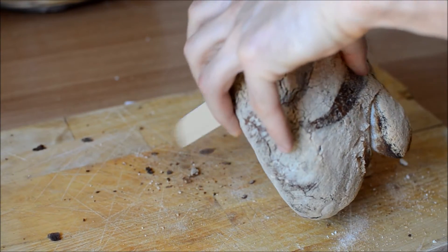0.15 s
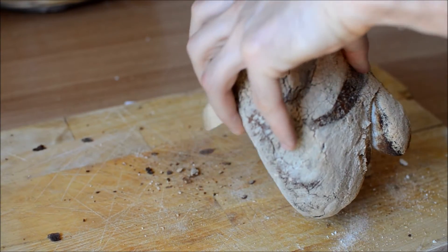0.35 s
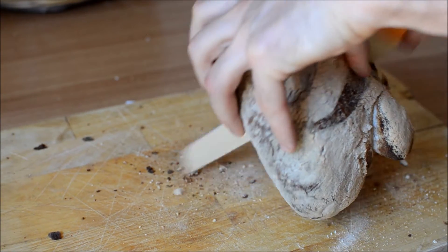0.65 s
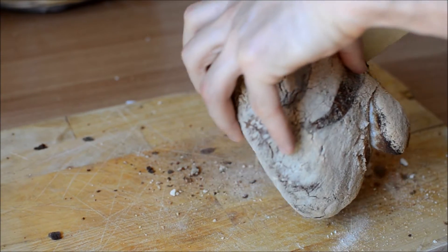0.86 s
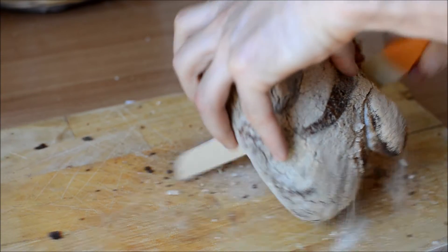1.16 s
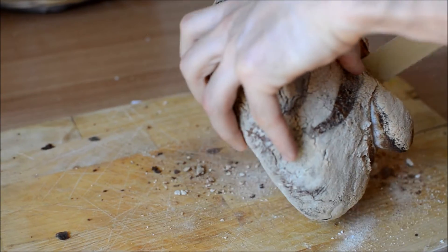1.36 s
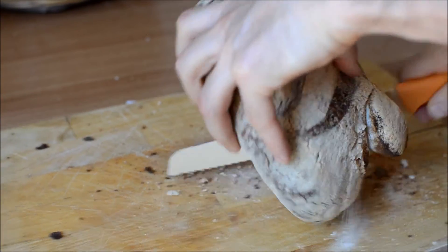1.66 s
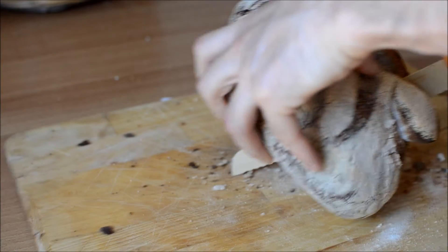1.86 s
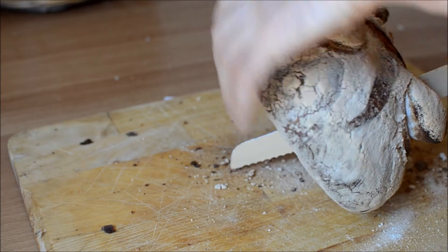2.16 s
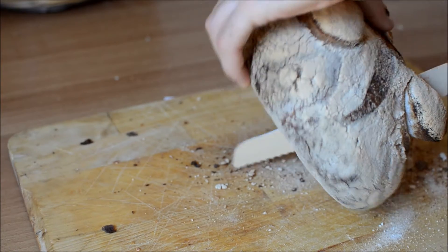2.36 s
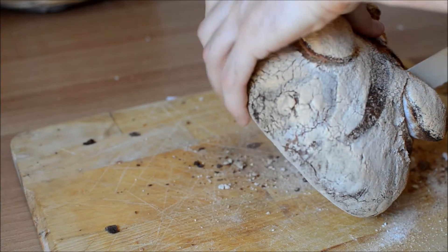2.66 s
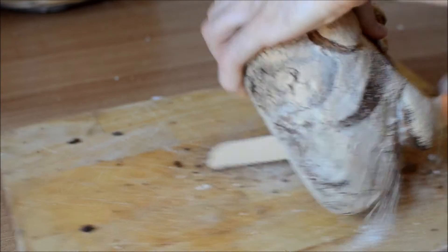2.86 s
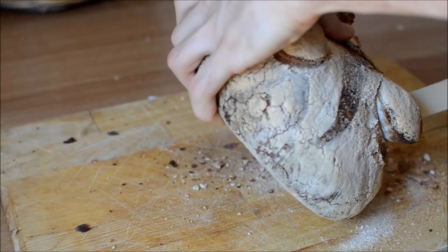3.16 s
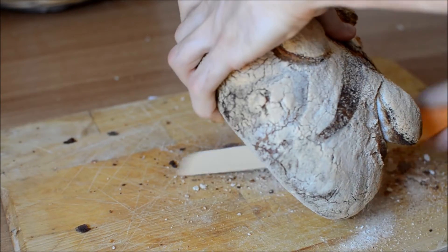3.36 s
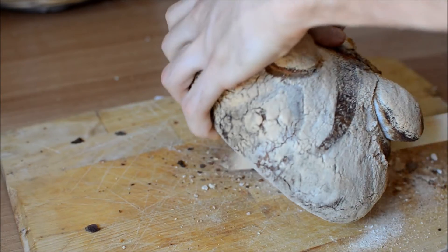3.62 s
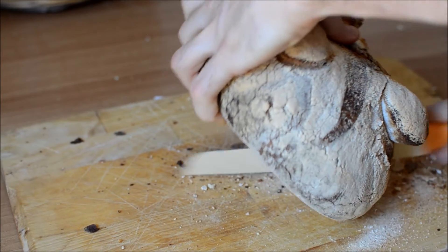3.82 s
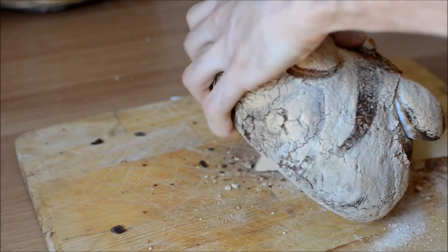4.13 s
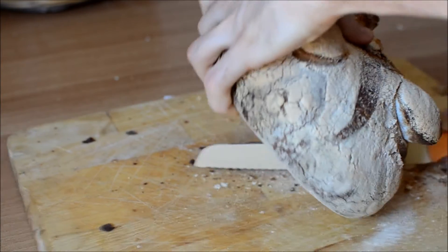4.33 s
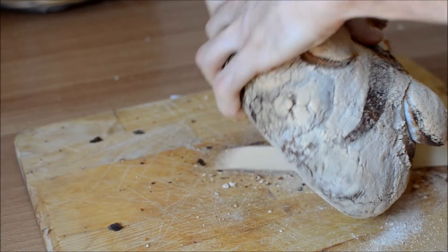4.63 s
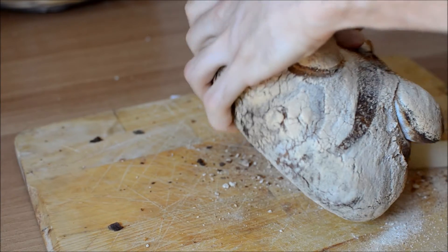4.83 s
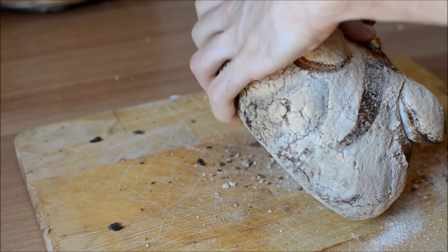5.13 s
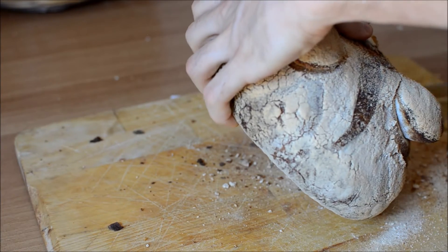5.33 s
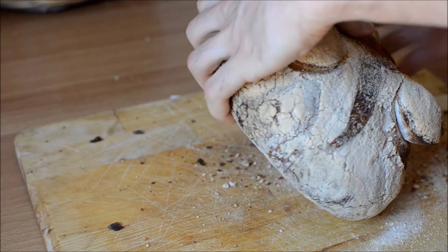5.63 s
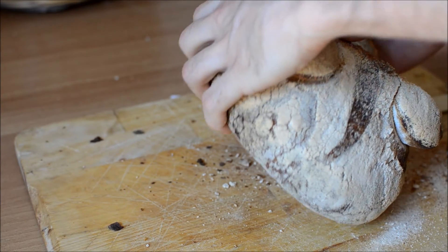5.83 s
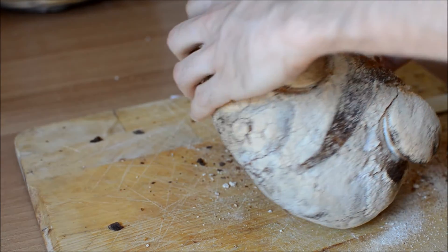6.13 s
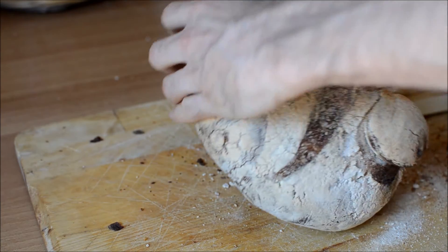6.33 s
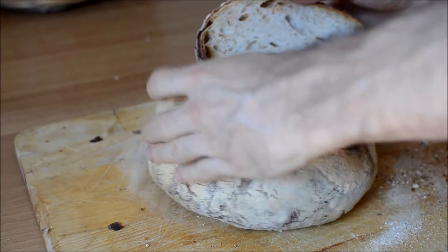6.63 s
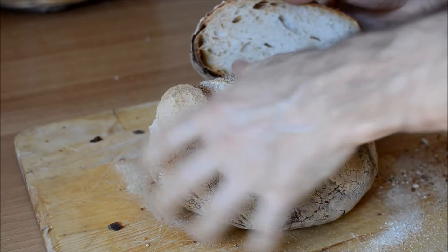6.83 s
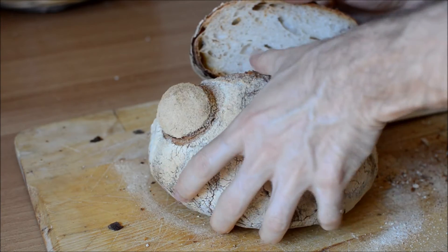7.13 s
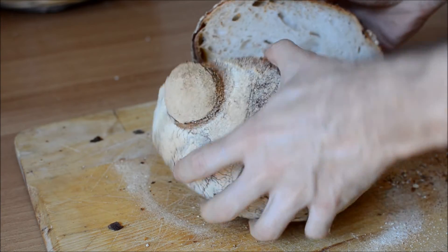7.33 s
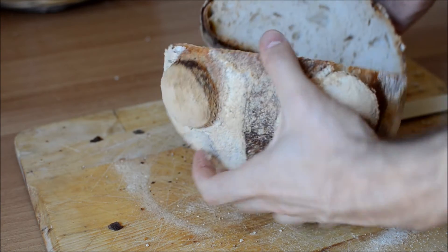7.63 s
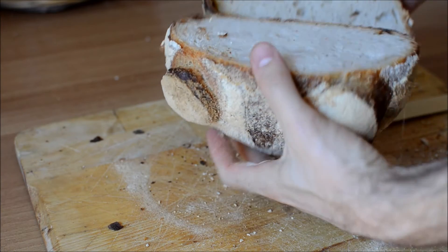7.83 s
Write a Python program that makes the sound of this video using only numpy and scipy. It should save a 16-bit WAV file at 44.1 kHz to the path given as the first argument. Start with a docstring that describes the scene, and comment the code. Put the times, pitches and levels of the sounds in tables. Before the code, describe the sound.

A serrated knife saws in uneven strokes through a hard bread crust with dry crackles and snaps, then clatters down; the loaf thumps over and slides.

```python
"""A serrated knife saws through a crusty loaf on a wooden board in a bare, ringing kitchen with a quiet room tone.
Hard pushes come among light strokes: impulse noise gated by the teeth rasps, crackles and drums,
pitched breaks snap, and in light strokes the blade rubs with a hollow tone.
The knife then clatters down as a run of resonant impacts. The loaf is slid over the floury board with soft
friction noise, tips onto its base with dull thumps and crunching crumbs, and is slid again."""
import sys
import numpy as np
from scipy import signal
from scipy.io import wavfile

SR = 44100
rng = np.random.default_rng(int(sys.argv[2]) if len(sys.argv) > 2 else 0)


def output_pcm(signal):
    """Save a mono or channel-first signal as 16-bit PCM at the path in sys.argv[1].

    Samples are clipped to [-1, 1] before scaling.
    """
    pcm = np.clip(np.atleast_2d(signal).T, -1, 1) * 32767
    wavfile.write(sys.argv[1], SR, np.round(pcm).astype(np.int16))


N = 351910
TIME = np.arange(N) / SR

# spectrum of breaking crust, for large pieces and small chips: frequency_hz, level_db
SNAP_COLOUR = [(300, -24.5), (1200, -5.5), (3000, -1.5), (4500, -2), (8000, -2.5), (11000, -14),
               (16000, -30.5)]
# light strokes, drawing back or easing through, levels before the layer trims:
# start_s, hold_s, rasp_db, drumming_db, crackle_db, rub_pitch_hz
PULLS = [(0.01, 0.13, -56, -56.5, -58.5, 1120), (0.58, 0.088, -58.5, -61, -63, 700),
         (0.876, 0.037, -50.5, -56, -51, 1040), (1.13, 0.1, -59, -65, -66, 620),
         (1.715, 0.033, -66.5, -74, -61, 1400), (1.99, .07, -81, -97, -76.5, 1390),
         (2.345, 0.061, -66, -68, -65, 518), (2.45, 0.086, -70.5, -72, -73.5, 860),
         (2.84, 0.094, -62, -83, -60.5, 1120), (3.04, .05, -65, -68, -79, 1070),
         (3.505, 0.05, -58, -59, -59, 690), (3.865, .04, -59, -71, -55, 2060),
         (3.96, 0.041, -60, -59.5, -60.5, 1280), (4.17, 0.062, -57.5, -59.5, -57.5, 604),
         (4.365, 0.039, -54, -58, -57, 854), (4.79, 0.046, -57, -60, -72, 520),
         (5.065, .02, -66, -71, -61.5, 1390), (5.105, .035, -58, -62.5, -59.5, 1460),
         (5.167, .03, -60, -56, -73, 1440)]


def amp(db):
    """Level to amplitude: 20 dB is a factor of ten."""
    return 10 ** (np.asarray(db) / 20)


def unit(x):
    """Normalisation to a root-mean-square value of one."""
    return x / np.sqrt(np.mean(x ** 2) + 1e-20)


def read(points, hz):
    """Interpolation of a frequency-dependent quantity on a logarithmic frequency axis."""
    f, value = np.transpose(points)
    return np.interp(np.log(hz + 1), np.log(f + 1), value)


def add(mix, s, sound):
    """Superposition: a sound is summed into the mix from time s."""
    part = mix[max(round(s * SR), 0):][:len(sound)]
    part += sound[:len(part)]


def response(db_at, size=4096):
    """Minimum-phase impulse response: the Hilbert transform of the log gain yields a causal phase."""
    hz = abs(np.fft.fftfreq(size, 1 / SR))
    log_gain = np.log(amp(np.maximum(db_at(hz), -100)))
    spectrum = np.exp(np.conj(signal.hilbert(log_gain)))
    return np.fft.ifft(spectrum).real[:size // 2]


def colour(x, points):
    """Minimum-phase filtering: shapes the spectrum without smearing attacks backwards."""
    return signal.oaconvolve(x, response(lambda hz: read(points, hz)))[:len(x)]


def resonate(x, hz, width):
    """Second-order resonance: gain one at its peak, set by centre frequency and bandwidth."""
    return signal.lfilter(*signal.iirpeak(hz, max(hz / width, 1), SR), x)


def wander(per_s):
    """Band-limited chance: random knots joined by straight lines, rms one."""
    knots = rng.standard_normal(8192)
    return unit(np.interp(TIME * per_s, np.arange(len(knots)), knots))


def clicks(per_s, spread_db, size=65536):
    """Impulse noise: random times and signs, levels spread exponentially in dB up or down from 0 dB."""
    count = int(per_s * N / SR)
    at, height, sign = rng.random((size, 3))[:count].T
    strength = amp(spread_db * np.minimum(-np.log1p(-height), 4))
    return np.bincount((at * N).astype(int), strength * np.sign(sign - .5), N)


def burst(points, crumble_s, crumble, size=2048):
    """Fracture impulse: one sharp break, then exponentially decaying noise; spectrum shaped, peak one."""
    decay = np.exp(-np.arange(size) / SR / crumble_s)
    drive = crumble * rng.standard_normal(size) * decay
    drive[0] = 1
    sound = colour(drive, points) * np.linspace(1, 0, size)
    return sound / abs(sound).max()


def swell(s, hold_s, rise_db_per_s, fall_db_per_s):
    """Exponential envelope: a gentle movement rises, holds and dies away at constant dB per second."""
    before_s = np.maximum(s - TIME, 0)
    after_s = np.maximum(TIME - s - hold_s, 0)
    return amp(-rise_db_per_s * before_s - fall_db_per_s * after_s)


def room_tone(level_db=-68):
    """Stationary background noise: white noise through a fixed spectrum."""
    # spectrum of the quiet room: frequency_hz, level_db
    tone_colour = [(15, -41), (25, -7), (137, -4.5), (222, -0.5), (283, -6), (342, 0.5), (729, -5),
                   (1320, -7), (1550, -5), (4100, -18), (5660, -20.5), (6310, -20), (8720, -27.5),
                   (15800, -45.5)]
    return amp(level_db) * unit(colour(rng.standard_normal(N), tone_colour))


def room(x, wet_db, gap_s=.002, build_s=0.0007):
    """Reverberation: direct sound, then dense reflections decaying at a frequency-dependent rate."""
    # time for a 60 dB decay, shortest in the treble: frequency_hz, decay_s
    decay_time = [(120, .68), (400, 0.55), (1000, 0.51), (2100, 0.52), (3000, .47), (7000, .4),
                  (14000, 0.38)]
    # initial spectrum of the reflections: frequency_hz, level_db
    wall_colour = [(60, 4), (300, -2), (1000, 1.5), (2500, 0), (5000, -0.5), (12000, -1)]
    t = np.arange(SR) / SR
    taps = rng.choice([-1., 1.], SR) * (rng.random(SR) < .15)  # random reflections over one second
    hz, age, bands = signal.stft(taps, SR, nperseg=256)
    fall_db = read(wall_colour, hz)[:, None] - 60 * age / read(decay_time, hz)[:, None]
    tail = signal.istft(bands * amp(fall_db), SR, nperseg=256)[1][:SR]
    tail = tail * np.clip((t - gap_s) / build_s, 0, 1)
    paths = amp(wet_db) * tail / np.linalg.norm(tail)  # reflected energy relative to direct
    paths[0] += 1
    return signal.oaconvolve(x, paths)


def flakes(per_s, spread_db, sharpness=1.6, count=6):
    """Brittle fracture: flakes of several sizes break, each size ringing at its own broad resonance."""
    # spectrum of the crackling crust: frequency_hz, level_db
    crackle_colour = [(500, -32.5), (1500, -3.5), (2700, 0.5), (3700, 0.5), (5200, -1.5), (6400, -2.5),
                      (8000, -8), (10000, -13.5), (12500, -22.5), (16000, -38)]
    out = np.zeros(N)
    for hz in np.geomspace(2000, 12000, count):
        breaks = clicks(per_s / count, spread_db, size=16384)
        out += unit(resonate(breaks, hz, hz / sharpness)) * np.sqrt(hz)
    return unit(colour(out, crackle_colour))


def handling(brush_db=-1):
    """Sliding friction: the loaf rubs over the floury board while fingers brush its crust."""
    # the hand moves the loaf, brushing before its trim: start_s, hold_s, slide_db, brush_db
    rubs = [(5.84, 0.058, -67, -62), (6.173, 0.074, -68.5, -81), (6.399, 0.12, -67, -68.5),
            (6.818, .14, -66, -93.5), (7.004, 0.53, -67, -77), (7.536, 0.12, -61.5, -78),
            (7.72, 0.29, -65, -88)]
    # spectrum of loaf sliding on board: frequency_hz, level_db
    slide_colour = [(35, -36), (60, -32), (90, -2), (140, 4), (180, -12), (400, 0.5), (720, -10),
                    (1470, -2), (3200, -11.5), (5100, -24), (8000, -38), (14000, -76)]
    gains = [amp(levels_db)[:, None] * swell(s, hold_s, rise_db_per_s=130, fall_db_per_s=80)
             for s, hold_s, *levels_db in rubs]
    slide, brush = np.max(gains, axis=0)
    rub = unit(colour(clicks(per_s=4300, spread_db=4.5), slide_colour))
    return slide * rub + amp(brush_db) * brush * flakes(per_s=5000, spread_db=4.5)


def loaf_down():
    """Soft-body impact: the loaf rocks onto its base with dull thumps and crunches crumbs under it."""
    # contacts of the tipping loaf: start_s, thump_db, crunch_db
    drops = [(6.5113, -36, -39.5), (6.525, -41, -37.5), (6.543, -46, -33.5), (6.557, -42.5, -38)]
    # spectrum of the whole loaf on the board: frequency_hz, level_db
    loaf_colour = [(25, -44), (50, -28), (100, 1), (180, -0.5), (330, 7), (600, -9), (1300, -16),
                   (2400, -27), (6000, -70)]
    # spectrum of crumbs under the loaf: frequency_hz, level_db
    crunch_colour = [(100, -26.5), (700, 1.5), (1900, 2), (2500, -3.5), (3200, -5.5), (4500, -9.5),
                     (6000, -14.5), (8300, -23.5), (16000, -49)]
    out = np.zeros(N)
    for s, thump_db, crunch_db in drops:
        add(out, s, amp(thump_db) * burst(loaf_colour, crumble_s=0.008, crumble=0.17))
        add(out, s, amp(crunch_db) * burst(crunch_colour, crumble_s=0.016, crumble=0.57))
    return out


def knife_down(wet_db=-1.5):
    """Modal impact: handle and blade strike in quick succession, each contact with its own echoes."""
    # contacts of the knife: start_s, clack_energy_db, thud_energy_db
    knocks = [(5.346, -3.5, -16), (5.3494, 8, -10), (5.3513, 6, -3.5), (5.3525, 12, -6.5),
              (5.356, 10, -1.5), (5.36, 1.5, -8), (5.3675, 2, -9.5), (5.396, -4, -8), (5.454, -11, -4.5),
              (5.469, -4.5, -9)]
    # resonances of knife on wood: frequency_hz, width_hz, level_db
    knife_modes = [(1342.5, 70, 2.5), (1954, 19, 2), (2070, 52, -5), (2240, 58, 0), (2524, 22, 0.5),
                   (2680, 80, -9), (2780, 75, -7.5), (3260, 350, -9), (6450, 350, -2.5)]
    # spectrum of the clack, before the resonances: frequency_hz, level_db
    clack_colour = [(25, -75.5), (60, -41.5), (100, -22), (155, -27), (240, -19.5), (310, -17.5),
                    (560, -16), (900, -8.5), (1400, -5), (2000, -1.5), (2450, 1.5), (4000, -6.5),
                    (5500, -18.5), (7400, -22), (11000, -43.5), (16000, -68)]
    # spectrum of the handle's thud: frequency_hz, level_db
    handle_colour = [(40, -55), (110, -13), (160, -24), (300, -4), (390, -7), (500, -2), (750, -2.5),
                     (1000, 3.5), (1400, -2), (3000, -26), (8000, -64)]
    out = np.zeros(N)
    for s, clack_db, thud_db in knocks:
        clack = burst(clack_colour, crumble_s=.0016, crumble=0.25)
        clack = clack + sum(amp(db) * resonate(clack, hz, width) for hz, width, db in knife_modes)
        thud = burst(handle_colour, crumble_s=0.0064, crumble=0.083)
        blow = amp(clack_db) * clack / np.linalg.norm(clack)
        blow = blow + amp(thud_db) * thud / np.linalg.norm(thud)
        add(out, s, room(blow, wet_db))
    return out


def pull(s, hold_s):
    """Exponential envelope of a light stroke: a steep rise and a slower fall."""
    return swell(s, hold_s, rise_db_per_s=331, fall_db_per_s=197)


def blade_rub(rub_db=-4, sharpness=3.0):
    """Resonant friction: the flat of the blade rubs in the cut, two equal resonances giving a hollow pitch."""
    slips, out = clicks(per_s=2500, spread_db=2.5), np.zeros(N)
    for s, hold_s, rasp_db, _, _, hz in PULLS:
        hollow = resonate(resonate(slips, hz, hz / sharpness), hz, hz / sharpness)
        out += amp(rasp_db + rub_db) * pull(s, hold_s) * unit(hollow)
    return out


def snaps(ring_db=6, ring_width_hz=900):
    """Brittle fracture with recoil: each large piece of crust rings at its own pitch and jolts the board."""
    # large pieces snapping, thump relative to the snap: start_s, level_db, thump_db, pitch_hz
    pieces = [(0.0074, -30.5, -10, 2040), (0.057, -34.5, -27, 1540), (0.1134, -53.5, -7, 1710),
              (0.298, -56, 6, 1580), (0.5714, -39, -17, 2040), (0.7163, -39, -16, 1700),
              (1.256, -45.5, -11, 2220), (1.4074, -35.5, -2, 1480), (2.3387, -42.5, -16, 2150),
              (2.398, -43, -24, 3470), (2.444, -42, -28, 5470), (2.6813, -41.5, -11, 2090),
              (2.723, -37, 6, 1780), (2.7566, -32, -4, 1820), (3.051, -45, -9, 3400),
              (3.2519, -29.5, 2, 2250), (3.3053, -30, -27, 2050), (3.3374, -23, -17, 3670),
              (3.4872, -38.5, -7, 1750), (3.699, -44, -4, 1616), (3.7853, -41, -2, 1530),
              (3.718, -31.5, -27, 1970), (3.7992, -34, -8, 3560), (4.239, -34.5, -22, 3320),
              (4.7216, -20, -19, 2720), (5.0601, -48, 3, 2100), (5.0954, -45, -2.5, 2080),
              (6.5118, -35, -20, 4000), (7.0494, -51.5, -11, 1528), (7.547, -43.5, -10, 4500)]
    # spectrum of the thump into the board: frequency_hz, level_db
    thump_colour = [(25, -59.5), (50, -22), (90, -8), (170, -9), (300, -2.5), (600, -6), (1300, -5.5),
                    (2500, -17), (6000, -43)]
    out = np.zeros(N)
    for s, level_db, thump_db, hz in pieces:
        crack = burst(SNAP_COLOUR, crumble_s=0.0022, crumble=0.43)
        crack = crack + amp(ring_db) * resonate(crack, hz, ring_width_hz)
        thump = burst(thump_colour, crumble_s=.002, crumble=0.19)
        add(out, s, amp(level_db) * (crack / abs(crack).max() + amp(thump_db) * thump))
    return out


def chips(crackle, per_s=40, spread_db=2.5, chip_db=-36, follow=.75):
    """Random fracture: small chips fly off, stronger as the blade makes the crust crackle harder."""
    breaks = clicks(per_s, spread_db, size=2048) * (crackle / crackle.max()) ** follow
    chip = burst(SNAP_COLOUR, crumble_s=.002, crumble=.25)
    return amp(chip_db) * signal.oaconvolve(breaks, chip)[:N]


def push(s, run_up_s, bite_s, hold_s, change_db, trail_db_per_s):
    """Piecewise envelope of a hard push: the blade skids, bites, holds, lets go and trails off."""
    run_up_db, skid_db = -22, -12.5  # at the start and end of the run-up
    let_go_s, let_go_db = 0.036, -16
    age = TIME - s
    early = np.maximum(-age - bite_s, 0) / run_up_s
    approach_db = skid_db + (run_up_db - skid_db) * early ** 2
    onset_db = approach_db * np.clip(-age / bite_s, 0, 1)
    hold_db = change_db * (np.clip(age / hold_s, 0, 1) - .5)
    release_db = let_go_db * np.clip((age - hold_s) / let_go_s, 0, 1)
    trail_db = -trail_db_per_s * np.maximum(age - hold_s - let_go_s, 0)
    return amp(onset_db + hold_db + release_db + trail_db)


def strokes():
    """Masking of envelopes: the strongest stroke at each instant sets rasp, drumming and crackle."""
    # hard pushes, start_s when the teeth bite fully, levels before the layer trims:
    # start_s, run_up_s, bite_s, hold_s, rasp_db, drumming_db, crackle_db
    pushes = [(0.366, 0.034, .05, 0.083, -45, -52.5, -45), (0.924, .07, 0.036, 0.044, -43, -46.5, -43.5),
              (1.413, 0.011, .01, .092, -42.5, -53, -46.5), (2.724, .04, 0.016, 0.048, -39.5, -49, -46),
              (3.254, .07, .005, .095, -43, -49, -47.5), (3.725, 0.029, .035, .048, -46, -50.5, -49.5),
              (4.556, 0.041, 0.062, 0.04, -47, -56.5, -45.5), (4.706, .03, 0.034, 0.038, -38.5, -51, -47)]
    # the loaf is jolted first and settles while more and more crust gives way;
    # rows rasp, drumming, crackle: lag_s, change_over_hold_db, trail_db_per_s
    push_layers = [(0, 0.5, 111), (-.003, -2, 104), (.004, 2.5, 130.5)]
    out = np.zeros((3, N))
    for s, run_up_s, bite_s, hold_s, *levels_db in pushes:
        shapes = [push(s + lag_s, run_up_s, bite_s, hold_s, change_db, trail)
                  for lag_s, change_db, trail in push_layers]
        out = np.maximum(out, amp(levels_db)[:, None] * shapes)
    for s, hold_s, *levels_db, _ in PULLS:
        out = np.maximum(out, amp(levels_db)[:, None] * pull(s, hold_s))
    return out


def sawing(full_teeth_per_s=230, unevenness=.3, catch_db=-0.5, clump_db=2.0, rasp_trim_db=0.5,
           crackle_trim_db=-0.9, boom_hz=305, boom_width_hz=55, boom_db=-47):
    """Stick-slip: teeth catch the crust in turn, faster in a strong stroke, and modulate the fractures."""
    # spectrum of teeth dragging through the loaf: frequency_hz, level_db
    rasp_colour = [(100, -33.5), (350, -5.5), (550, 0.5), (780, -0.5), (1000, -1), (1300, 0.5),
                   (1600, -1.5), (2000, -1.5), (2600, -8.5), (3600, -9), (5000, -21.5), (9000, -35.5),
                   (16000, -55.5)]
    # spectrum of loaf and board drumming: frequency_hz, level_db
    thrum_colour = [(30, -39.5), (55, -26.5), (85, -8), (140, -19), (185, -5.5), (220, -7), (260, -1.5),
                    (330, -0.5), (370, -6.5), (420, -9.5), (480, -7.5), (650, -15.5), (1500, -47.5)]
    bite, press, crackle = strokes()
    speed = (bite / bite.max()) ** .25 * np.exp(unevenness * wander(per_s=83))
    teeth = np.cos(2 * np.pi * np.cumsum(full_teeth_per_s * speed) / SR)
    grip = unit(amp(catch_db * teeth + clump_db * wander(per_s=140)))
    thrum = unit(colour(grip * clicks(per_s=2600, spread_db=2.5), thrum_colour))
    hardness = (press / press.max()) ** 2.4  # hard pushes dominate the boom of the loaf
    boom = unit(resonate(thrum, boom_hz, boom_width_hz)) * hardness
    rasp = unit(colour(grip * clicks(per_s=2200, spread_db=2.0), rasp_colour))
    crust = grip * flakes(per_s=4300, spread_db=-1.5)
    low = press * thrum + amp(boom_db) * boom
    high = amp(rasp_trim_db) * bite * rasp + amp(crackle_trim_db) * crackle * crust
    return low + high + chips(crackle)


def scene():
    """Superposition of sources: bread and knife, each with its own reverberation, over room tone."""
    loaf = sawing() + blade_rub() + snaps() + handling() + loaf_down()
    bread = room(loaf, wet_db=-5.5)[:N]
    return (bread + knife_down() + room_tone())[None]


def record(dry, edge_hz=15850, ceiling=.95):
    """Transduction: the microphone's dips, soft saturation of the highest peaks, then a low-pass limit."""
    # narrow dips in the microphone's response: frequency_hz, width_hz, depth_db
    mic_dips = [(5684, 310, -11), (6900, 90, -11)]
    mic = response(lambda f: sum(db / (1 + (2 * (f - hz) / width) ** 2) for hz, width, db in mic_dips))
    heard = signal.oaconvolve(dry, mic[None])[:, :N]
    heard = heard / (1 + (heard / ceiling) ** 6) ** (1 / 6)
    low_pass = signal.firwin(511, edge_hz, window=("kaiser", 9), fs=SR)
    return signal.oaconvolve(heard, low_pass[None], "same")


dry = scene()
out = record(dry)
output_pcm(out)
```